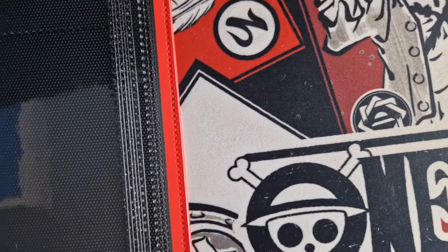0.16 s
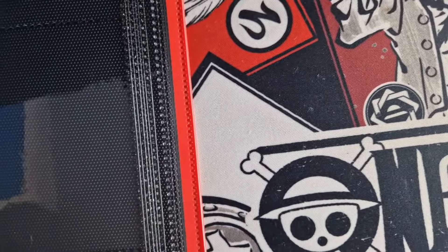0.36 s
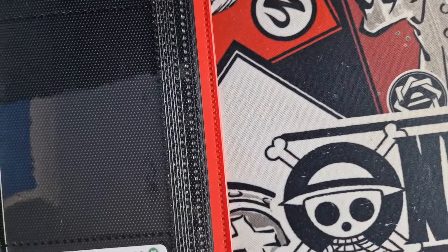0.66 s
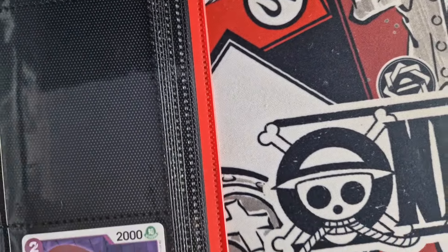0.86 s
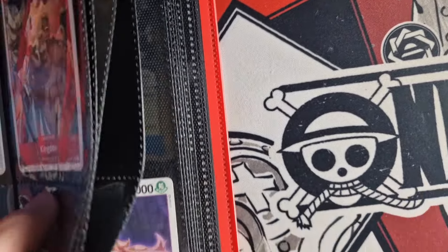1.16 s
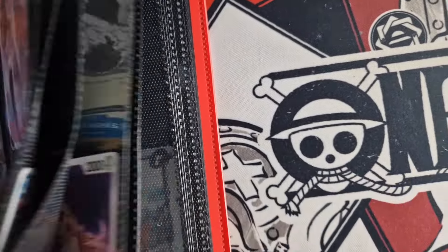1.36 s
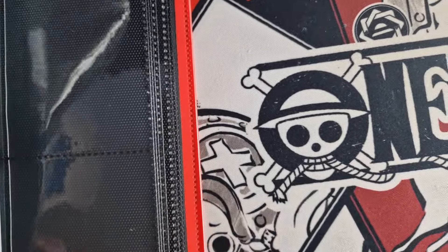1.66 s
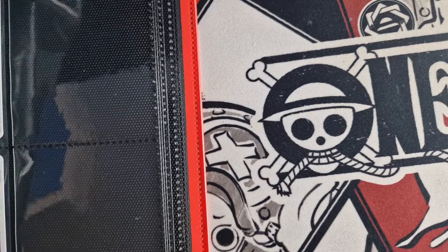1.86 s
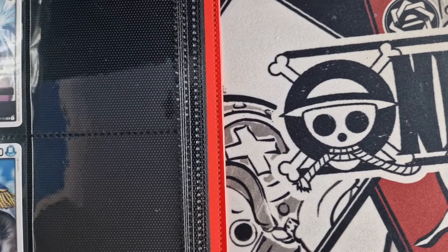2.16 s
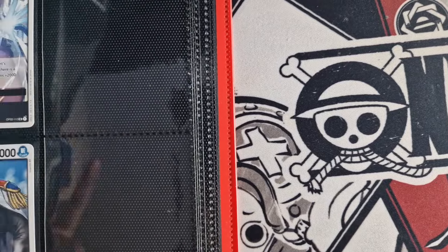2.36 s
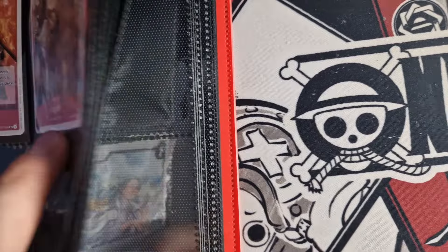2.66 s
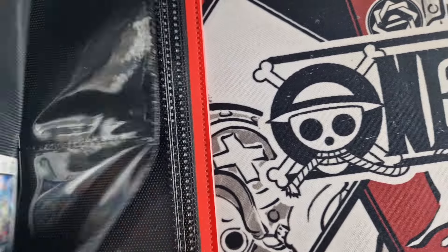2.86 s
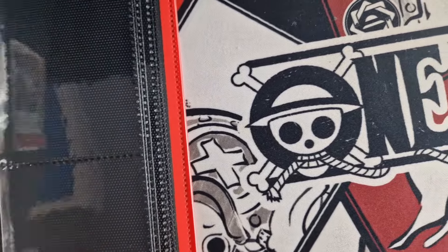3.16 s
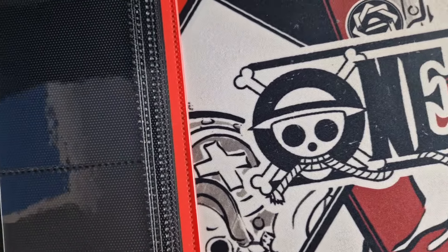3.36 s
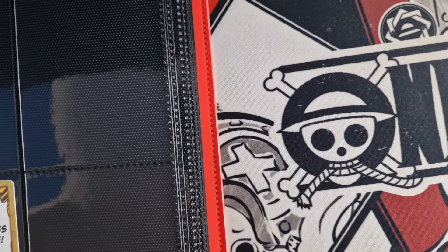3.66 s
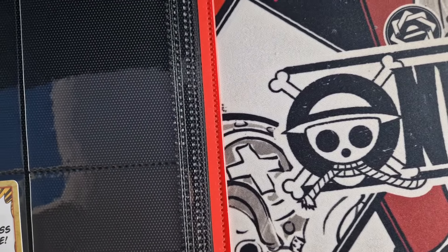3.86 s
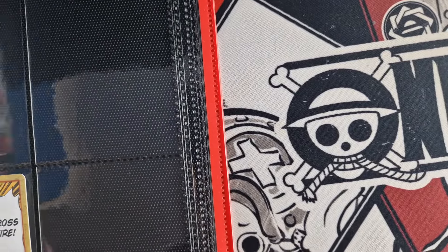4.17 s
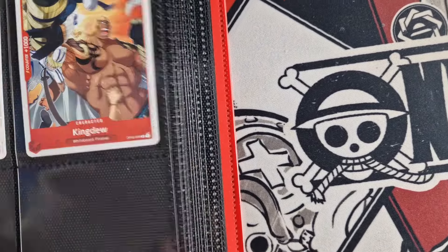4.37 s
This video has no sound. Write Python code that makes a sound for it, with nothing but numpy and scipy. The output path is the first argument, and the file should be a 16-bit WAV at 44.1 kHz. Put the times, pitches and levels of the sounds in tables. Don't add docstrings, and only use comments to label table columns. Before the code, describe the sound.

Close, irregular rustling of plastic pocket pages being turned, with slippery swishes, scattered creasing ticks, and a sharp crackling burst around three seconds.

```python
import sys
import numpy as np
from scipy import signal
from scipy.fft import rfft, irfft
from scipy.io import wavfile
from scipy.ndimage import uniform_filter1d

SR = 44100
rng = np.random.default_rng(int(sys.argv[2]) if len(sys.argv) > 2 else 0)


def gain_from_db(level_db):
    decades = np.asarray(level_db, float) / 20
    return 10 ** decades


def put_to_file(sound):
    columns = np.atleast_2d(sound).T
    safe = np.clip(columns, -1, 1)
    whole_steps = np.round(safe * 32767)
    wavfile.write(sys.argv[1], SR, whole_steps.astype(np.int16))


N = 198567

# (peak time [s], pressure [dB], rise per 20 dB [ms], fall per 20 dB [ms], sheen [dB])
TURNS = [(.008, -52, 40, 20, 12), (.02, -47, 33, 19, -8), (0.172, -41.5, 86, 119, -3),
         (.626, -66, 400, 54, -17), (1.201, -59, 45, 53, 5), (1.241, -58.5, 102, 39, -7.5),
         (1.56, -47, 16, 17, -9), (1.655, -50.5, 200, 16, -5.5), (1.724, -41, 23, 24, 5),
         (1.965, -42, 32, 49, 4), (2.336, -60.5, 30, 100, -22), (2.412, -55, 9, 22, 13),
         (2.691, -61, 30, 108, -4), (2.931, -66, 299.5, 19, -18), (2.982, -45, 23, 45, 6.5),
         (3.181, -45.5, 129.5, 70, 4), (3.317, -60, 100, 150.5, -10), (3.395, -45, 50, 129, 3),
         (3.701, -62.5, 30, 123, -17), (4.318, -44, 21, 61, 1), (4.455, -46.5, 19, 33, 0.5),
         (4.502, -43.5, 13, 20, -7), (.745, -64.5, 77, 10, -11), (.122, -48.5, 44, 44, 1.5),
         (.79, -51, 33, 40, 5)]
# (start [s], length [s], pressure [dB], sheen [dB], page body [dB])
DRAGS = [(0.117, .13, -48.5, -1.5, 4), (0.356, 0.084, -66, -17, 11.5), (3.432, .1, -51.5, -7, 3),
         (1.049, 0.0038, -46, -3, 4), (0.7535, 0.052, -43, -9, -3.5), (0.932, 0.076, -64.5, -10, 7),
         (0.989, 0.059, -49.5, -9.5, 7), (1.07, 0.064, -72.5, 0, -6), (1.181, 0.048, -61.5, 5, -7),
         (1.305, 0.15, -72.5, -7, -3), (1.671, 0.012, -47.5, 6, -4), (1.738, 0.1, -49, 1, 1.5),
         (1.858, 0.066, -61, 0, -3), (2.009, .13, -49, -5.5, 1.5), (2.347, .07, -59.5, -8, -2),
         (2.437, .13, -68, -11, -3.5), (2.594, 0.094, -60.5, -4.5, 2), (3.017, 0.033, -62.5, -3, -15),
         (3.105, 0.11, -54.5, 1, -3.5), (3.36, 0.07, -47, -6, 4), (3.655, 0.029, -56.5, -25, 1),
         (4.177, 0.053, -60.5, -19, 4), (4.295, 0.049, -45.5, -1, 0), (4.37, 0.11, -58.5, -10, -10)]
# (time [s], pressure [dB], fall per 20 dB [ms], sheen [dB], page body [dB])
FLICKS = [(.078, -56.5, 100, -26, 5), (.251, -56, 250, -13.5, 5), (.841, -56, 168, -21, -1.5),
          (0.903, -53.5, 84, -4, 11), (1.432, -53, 30, -14, -8), (1.448, -46, 11, -15, -11),
          (1.464, -51.5, 108, -9, 1), (1.505, -57, 40, 2, 0), (1.704, -47, 30, 7, -7),
          (1.938, -47.5, 62, 0, -1), (2.171, -64, 60, -3.5, 4), (2.586, -50.5, 15, -12, -6),
          (2.617, -59, 29, -15, 16), (3.218, -50.5, 44, 3, 11.5), (3.235, -58.5, 101, 4, -6),
          (3.544, -57.5, 142, -22, 1.5), (4.184, -54, 40, -18, 2), (4.297, -52.5, 69, -7, 11),
          (2.955, -47.5, 60, 1, -3), (1.985, -54, 60, -11, 14), (4.496, -52, 17, -14, 17),
          (2.8, -60.5, 60, -26, -2), (2.912, -61, 60, -8, 6), (4.27, -68, 40, -4, 3)]
# (start [s], length [s], pressure [dB], edge [dB])
SCUFFS = [
    (0.756, .045, -52, 13),
    (2.035, 0.027, -51.5, 16.5),
    (3.636, 0.016, -62, 9),
    (4.205, 0.038, -60.5, 9.5),
    (4.161, .006, -67.5, 6),
    (1.87, 0.014, -63.5, 10),
]
# (frequency [Hz], density [dB per Hz])
FILM_SPECTRUM = [(150, -8.5), (500, -5.5), (1100, 0), (1400, 3.5), (2150, 4), (3100, 0), (5500, -5),
                 (8000, -7), (9500, -13), (13000, -8), (16000, -14)]
# (frequency [Hz], width [Hz], level [dB])
CAVITIES = [(2150, 105, -7), (5630, 390, -3), (7490, 290, -2)]
# (time [s], peak [dB], centre [Hz])
TICKS = [(0.0204, -30.5, 2350), (0.451, -35.5, 1200), (0.7347, -36, 3200), (0.831, -23, 1990),
         (1.0583, -20.5, 2150), (1.2345, -30.5, 2150), (1.243, -30.5, 1411), (1.3308, -33, 3070),
         (1.4462, -19, 1940), (1.5287, -13.5, 6700), (1.5583, -24, 2110), (1.529, -26.5, 1400),
         (1.113, -42, 7500), (2.914, -36, 900), (4.4975, -20, 1100), (1.6357, -20.5, 2880),
         (1.6604, -20, 4000), (1.723, -15, 4200), (2.4103, -32, 2200), (2.5815, -39, 2200),
         (2.617, -25, 2040), (2.7975, -35.5, 1890), (3.637, -37, 2217), (3.6735, -34, 2250),
         (4.1775, -28, 5260), (4.204, -37, 2010), (4.4073, -32, 2060)]
# (time [s], peak [dB],
# centre [Hz], sheen [dB])
CRACKS = [(.9019, -41, 2080, -15), (1.044, -23.5, 2220, -28), (1.184, -39, 2420, -17),
          (1.3119, -45, 2070, -17), (1.4642, -19.5, 1957, -11), (1.6157, -30.5, 5000, -6),
          (1.6747, -18.5, 5830, -28), (1.681, -18.5, 4130, -22), (1.7074, -16.5, 2150, -24),
          (1.8418, -25, 5740, -13), (2.09, -29, 5030, -23), (2.6653, -32, 2120, -14),
          (2.736, -45.5, 2310, -23), (1.567, -31.5, 5000, -18.5), (2.939, -27, 1590, -4),
          (2.9543, -15.5, 5220, -1), (2.9644, -14, 5430, 1), (2.9757, -17, 6430, 4),
          (2.981, -17, 7540, 2.5), (2.9827, -17.5, 5910, 1.5), (3.146, -30, 7260, -15.5),
          (3.311, -30, 2010, -30), (3.3724, -23, 4400, -13), (1.9335, -38, 3000, -14),
          (0.7531, -26.5, 4940, -15), (1.4335, -38, 2260, -25), (1.4662, -27, 6500, -10),
            (1.474, -32, 4500, -3), (1.498, -36, 5500, -8), (1.508, -40, 2200, -12),
            (1.5165, -42, 7000, -12), (1.533, -31, 7000, -18), (1.5697, -29, 4000, -18),
            (1.599, -35.5, 2230, -20), (1.62, -35.5, 2300, -13.5), (1.628, -38, 2500, -15),
            (1.632, -33, 3000, -18.5), (1.645, -35, 2500, -15), (1.669, -32, 2200, -30),
            (1.671, -26, 4500, -4), (1.698, -33, 2200, -15), (1.703, -26, 6000, -8),
            (1.711, -24, 5800, -12), (1.7174, -22, 6500, -6), (1.7212, -18.5, 6000, -15),
            (1.7258, -22, 5800, -16), (1.752, -31, 2200, -18), (2.9725, -15, 5530, 2.5),
            (2.9769, -16, 5500, 6), (2.9853, -22.5, 3500, -7.5), (2.9945, -30, 4500, -10),
            (3.2162, -7, 10100, -17), (3.218, -24, 3300, -8), (.457, -46, 3000, -15), (.62, -46, 1500, -30),
            (4.2953, -30, 4500, -12), (4.305, -31, 5500, -10), (1.4465, -24, 4000, -11),
            (0.7557, -28, 4300, -14), (2.35, -47, 2500, -20), (2.379, -38, 2300, -25),
            (3.0945, -38, 3000, -12), (2.0665, -32, 2300, -15), (.878, -44, 6000, -10),
            (1.192, -40, 2980, -10), (3.382, -28, 2100, -20)]
# (time [s], peak [dB], centre [Hz], breadth [dB], sheen [dB])
POCKET_CRACK = (3.2159, -11, 2700, 7, 4)
# (start [s], length [s], level [dB], first pitch [Hz], last pitch [Hz])
GLIDES = [
    (1.96, 0.217, -57.5, 780, 200),
    (3.357, .05, -51.5, 750, 500),
    (2.05, .03, -52, 650, 600),
    (1.0, .06, -64, 700, 470),
    (4.297, 0.062, -52, 1070, 840),
    (2.0, 0.081, -55, 350, 230),
]
# (time [s], peak [dB], pitch [Hz], T60 [s])
THUDS = [(0.2095, -29.5, 47, 0.033), (.2122, -30, 150, 0.024), (0.831, -33, 133, 0.034),
         (1, -38, 200, 0.033), (1.2, -37.5, 65, 0.055), (3.3575, -37, 99, .04), (2.407, -35.5, 61, 0.038),
         (2.4, -40.5, 67, 0.062), (2.423, -38.5, 97, .03), (2.955, -37.5, 310, .02), (2.973, -36, 330, .03),
         (3.2165, -29, 800, .012), (2.7, -35, 90, .04), (.385, -41.5, 320, 0.026), (3.217, -36, 84, 0.12),
         (3.1, -42, 370, 0.056)]
# (time [s], peak [dB], pitch [Hz], T60 [s])
STACK_KNOCKS = [
    (.753, -40, 820, 0.04),
    (1.962, -37.5, 765, 0.043),
    (4.312, -35.5, 848, 0.037),
    (4.4995, -24, 160, 0.03),
]
# (time [s], peak [dB], pitch [Hz], T60 [s])
LIFTS = [
    (1.879, -35, 258, .025),
    (1.5165, -39, 50, .05),
    (3.371, -39, 150, .03),
    (2.638, -40, 40, .08),
    (4.496, -34, 120, .03),
]
# (peak time [s], level [dB], rise per 20 dB [s], fall per 20 dB [s])
PUFFS = [(.1, -54.5, 6, .5), (.22, -42, .3, .16), (.5, -59, .5, 4), (.83, -47, .02, .32),
         (1.06, -64, 2, .2), (1.2, -57, .03, .1), (1.52, -47, .1, .45), (1.92, -54, .2, .5),
         (2.15, -53, .2, .04), (2.4, -45, .06, .15), (2.65, -43, .1, .05), (.74, -58, .1, .05),
         (0, -47, .1, .1), (3.7, -60, .05, .2), (2.85, -62.5, 1.5, .05), (2.99, -55, .2, .8),
         (3.23, -47.5, .02, .07), (3.37, -47, .14, .04), (3.99, -69, 2.5, .6), (4.31, -65, .05, 2),
         (4.5, -52, .18, .1)]
# (frequency [Hz], likeness [0 to 1])
PAGE_LIKENESS = [(100, 0.82), (500, 1), (1200, 0.82), (3000, 0.37), (7000, 0.16), (14000, 0.1)]
# (frequency [Hz], left minus right [dB])
PAGE_LEAN = [(100, 3), (500, 8), (1000, 2.5), (2200, -2.5), (5000, 1), (10000, 4), (15000, 8)]
# (frequency [Hz], delay [samples])
RIGHT_DELAY = [(200, 11), (700, 14), (1500, 20), (16000, 21)]
# (frequency [Hz], density [dB per Hz])
ROOM_SPECTRUM = [(25, -33), (53, -4), (110, -16.5), (200, -7), (400, -14.5), (600, -18), (1100, -29.5),
                 (2200, -38), (4900, -63), (5400, -49), (6800, -54), (7800, -47), (8600, -49), (9000, -65),
                 (16000, -47.5)]
# (frequency [Hz], likeness [0 to 1])
ROOM_LIKENESS = [(60, 0.5), (180, 0.99), (550, 0.72), (1650, 0.13), (4970, 0.014), (15000, 0.047)]
# (frequency [Hz], left minus right [dB])
ROOM_LEAN = [(60, 1), (150, 1.5), (380, 5.5), (950, 3.5), (2380, 0), (5980, 24), (15000, 18)]
# (frequency [Hz], width [Hz], rms level [dB])
MACHINE_HUM = [
    (150.9, 11, -61),
    (339, 14, -66.5),
]

GRIP_S, LET_GO_S, FLICK_S = 0.002, 0.026, 0.0087
EDGE_DB, EDGE_PER_SHEEN = 4.5, 0.39
BODY_DB, BODY_PER_PRESSURE = -3, -0.27
SCUFF_SHEEN_DB = -12
TICK_BREADTH_DB, TICK_SHEEN_DB, TICK_T60_S = -23.5, -25.5, 0.0081
CRACK_BREADTH_DB, CRACK_T60_S, POCKET_T60_S = -5, 0.0073, 0.0053
GLIDE_BREADTH = 0.42
ROOM_DB = -58.5
CONTROL_STEP = 16


def rub():
    pressure_db, edge_db, sheen_db, body_db = strokes()
    s = np.arange(len(sheen_db)) * CONTROL_STEP / SR
    hz, t, z = blend(slips(), PAGE_LIKENESS, PAGE_LEAN, size=256)
    top = np.clip((hz - 8000) / 1500, 0, 1)[:, None]
    middle = np.clip((hz - 2700) / 900, 0, 1)[:, None] - top
    bottom = np.clip((1700 - hz) / 500, 0, 1)[:, None]
    tilt_db = middle * np.interp(t, s, edge_db)
    tilt_db = tilt_db + top * (np.interp(t, s, sheen_db) + 5.5)
    tilt_db = tilt_db + bottom * (np.interp(t, s, body_db) + 7.5)
    patches = uniform_filter1d(rng.standard_normal(z.shape[1:]), 3, 0)
    patches_db = 2.4 * evened(uniform_filter1d(patches, 9, 1))
    z *= gain_from_db(read(FILM_SPECTRUM, hz)[:, None] + tilt_db + patches_db)
    film = signal.istft(z, nperseg=256)[1][:, :N]
    return film * gain_from_db(np.interp(np.arange(N) / SR, s, pressure_db) + 7.5)


def slips():
    clump = gain_from_db(6.0 * evened(uniform_filter1d(rng.standard_normal(N), 300)))
    happens = rng.random(N) < 500 * clump / SR
    size = gain_from_db(4.3 * np.minimum(rng.exponential(1, N), 3)) * happens
    decay = np.exp(-np.arange(600) / (0.0011 * SR))
    flare = signal.oaconvolve(size ** 2, decay)[:N]
    power = 0.8 + 0.5 * abs(flare) / flare.mean()
    return evened(np.sqrt(power) * rng.standard_normal((2, N)))


def strokes():
    rows = []  # (power, sheen dB, body dB, edge dB)
    for s, db, rise_ms, fall_ms, sheen_db in TURNS:
        power = swell(s, 0, db, rise_ms / 1000, fall_ms / 1000)
        rows.append((power, sheen_db, 0, EDGE_DB + EDGE_PER_SHEEN * sheen_db))
    for s, length, db, sheen_db, body_db in DRAGS:
        power = swell(s, length, db, GRIP_S, LET_GO_S)
        rows.append((power, sheen_db, body_db, EDGE_DB + EDGE_PER_SHEEN * sheen_db))
    for s, db, fall_ms, sheen_db, body_db in FLICKS:
        power = swell(s, 0, db, FLICK_S, fall_ms / 1000)
        rows.append((power, sheen_db, body_db, EDGE_DB + EDGE_PER_SHEEN * sheen_db))
    for s, length, db, edge_db in SCUFFS:
        rows.append((swell(s, length, db, GRIP_S, LET_GO_S), SCUFF_SHEEN_DB, 0, edge_db))
    power, sheen_db, body_db, edge_db = map(np.array, zip(*rows))
    total = power.sum(0)
    share = power / total
    pressure_db = 10 * np.log10(total)
    body_curve_db = body_db @ share + BODY_DB + BODY_PER_PRESSURE * (pressure_db + 54.5)
    return pressure_db, edge_db @ share, sheen_db @ share, body_curve_db


def snaps():
    out, t = np.zeros((2, N)), np.arange(1500) / SR
    broad = signal.butter(2, [1300, 11000], "band", fs=SR)
    bright = signal.butter(3, 9500, "high", fs=SR)
    events = [(*POCKET_CRACK, POCKET_T60_S)]
    events += [(*row, TICK_BREADTH_DB, TICK_SHEEN_DB, TICK_T60_S) for row in TICKS]
    for s, db, hz, sheen_db in CRACKS:
        events.append((s, db, hz, CRACK_BREADTH_DB, sheen_db, CRACK_T60_S))
    for s, db, hz, breadth_db, sheen_db, t60 in events:
        fade = gain_from_db(-60 * t / t60) + gain_from_db(-24 - 60 * t / 0.04) + 0.7 * gain_from_db(-60 * t / 0.002)
        burst = rng.standard_normal((2, len(t))) * fade * (1 - np.exp(-t / 0.00015))
        centre = resonate(resonate(burst, hz, 0.32 * hz), hz, 3.2 * hz)
        parts = centre, signal.lfilter(*broad, burst), signal.lfilter(*bright, burst)
        for part, share_db in zip(parts, (-3, breadth_db - 1, sheen_db + 3)):
            add(out, s, gain_from_db(db - 4.5 + share_db) * part / abs(part).max(1, keepdims=True))
    z = blend(out, PAGE_LIKENESS, PAGE_LEAN, size=128)[2]
    return signal.istft(z, nperseg=128)[1][:, :N]


def glides():
    out = np.zeros(N)
    for s, length, db, from_hz, to_hz in GLIDES:
        noise = rng.standard_normal(SR // 2)[:int(length * SR)]
        u = np.linspace(0, 1, len(noise))
        pitch = from_hz * (to_hz / from_hz) ** u
        turn = np.exp(2j * np.pi * np.cumsum(pitch) / SR)
        r = np.exp(-np.pi * GLIDE_BREADTH * (from_hz + to_hz) / 2 / SR)
        hum = (turn * signal.lfilter([1], np.poly([r, r]), noise / turn)).real
        add(out, s, gain_from_db(db) * evened(hum) * np.sqrt(np.sin(np.pi * u ** 0.66)))
    return lean_left(out, 2)


def thuds():
    out, t = np.zeros(N), np.arange(6000) / SR
    events = [(1, *row) for row in THUDS + STACK_KNOCKS] + [(-1, *row) for row in LIFTS]
    for sign, s, db, hz, t60 in events:
        fade = gain_from_db(-60 * t / max(t60, 0.01)) * (1 - np.exp(-t / 0.00037))
        add(out, s, sign * gain_from_db(db + 0.5) * np.cos(2 * np.pi * hz * t) * fade)
    return lean_left(out, 1.2)


def heave():
    power = sum(swell(s, 0, db, rise, fall) for s, db, rise, fall in PUFFS)
    band = signal.butter(2, [28, 105], "band", fs=SR, output="sos")
    shared, opposed = signal.sosfilt(band, rng.standard_normal((2, N)))
    low = evened(lean_left(shared, 1.1) + 0.068 * opposed * np.array([[1], [-1]]))
    return low * np.sqrt(np.repeat(power, CONTROL_STEP)[:N]) * gain_from_db(-3.5)


def walls(x):
    t = np.arange(12000) / SR
    tail = rng.standard_normal((2, len(t))) * gain_from_db(-60 * t / 0.18) * (t > 0.003)
    tail = signal.lfilter([1], [1, -0.5], tail)
    return signal.fftconvolve(x, tail / np.linalg.norm(tail[0]), axes=1)[:, :N]


def room():
    hz, t, z = blend(rng.standard_normal((2, N)), ROOM_LIKENESS, ROOM_LEAN, size=2048)
    z = z * gain_from_db(read(ROOM_SPECTRUM, hz))[:, None]
    wash = evened(signal.istft(z, nperseg=2048)[1][:, :N])
    hum = np.zeros(N)
    for line_hz, width, db in MACHINE_HUM:
        line = resonate(resonate(rng.standard_normal(N), line_hz, width), line_hz, width)
        hum += gain_from_db(db) * evened(line)
    return gain_from_db(ROOM_DB - 3.5) * wash + lean_left(hum, 1.4)


def swell(s, hold, db, rise, fall):
    t = np.arange(N // CONTROL_STEP + 1) * CONTROL_STEP / SR
    early, late = np.maximum(s - t, 0), np.maximum(t - s - hold, 0)
    return gain_from_db(db - 20 * early / max(rise, 1e-3) - 20 * late / max(fall, 1e-3)) ** 2 + 1e-14


def blend(pair, likeness, lean, size):
    hz, t, (a, b) = signal.stft(pair, SR, nperseg=size)
    c = np.clip(read(likeness, hz), -1, 1)[:, None]
    z = np.array([a, c * a + np.sqrt(1 - c ** 2) * b])
    gain_db = np.array([0.5, -0.5])[:, None] * read(lean, hz)
    return hz, t, z * gain_from_db(gain_db)[..., None]


def lean_left(x, db):
    return x * gain_from_db([[db], [-db]])


def resonate(x, hz, width):
    r = np.exp(-np.pi * width / SR)
    return 2 * signal.lfilter([1 - r], [1, -r * np.exp(2j * np.pi * hz / SR)], x).real


def evened(x):
    return x / np.sqrt(np.mean(x ** 2) + 1e-20)


def read(points, hz):
    f, value = np.transpose(points)
    return np.interp(np.log(hz + 1), np.log(f + 1), value)


def add(mix, s, sound):
    part = mix[..., round(s * SR):][..., :sound.shape[-1]]
    part += sound[..., :part.shape[-1]]


def scene():
    pages = rub() + snaps()
    pages = pages + sum(gain_from_db(db) * resonate(pages, hz, width) for hz, width, db in CAVITIES)
    left, right = pages + thuds() + glides()
    hz = np.fft.rfftfreq(N, 1 / SR)
    delay = np.exp(-2j * np.pi * hz * read(RIGHT_DELAY, hz) / SR)
    right = irfft(rfft(right) * delay, N)
    return np.array([left, right]) + gain_from_db(-15.0) * walls(pages) + heave() + room()


def low_pass(x):
    return signal.sosfilt(signal.butter(12, 16830, fs=SR, output="sos"), x)


def record(dry):
    limited = signal.oaconvolve(dry, signal.firwin(255, 16100, fs=SR)[None], "same")
    return low_pass(limited)


dry = scene()
out = record(dry)
put_to_file(out)
```